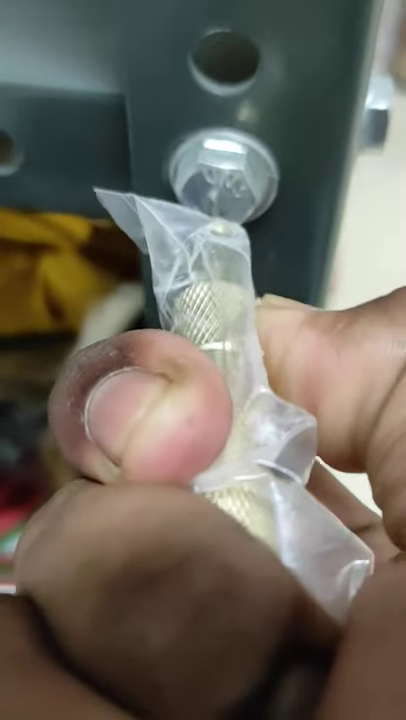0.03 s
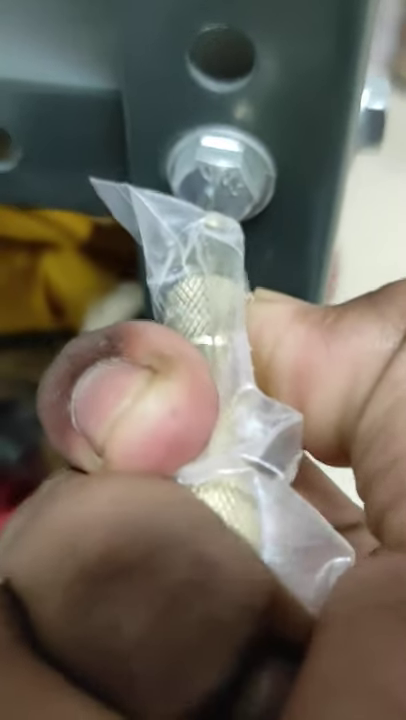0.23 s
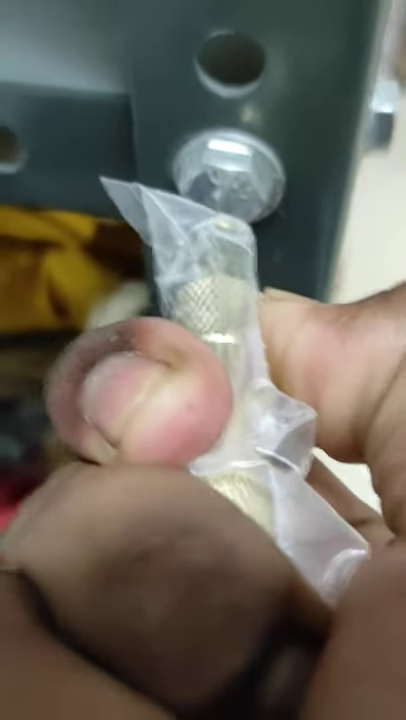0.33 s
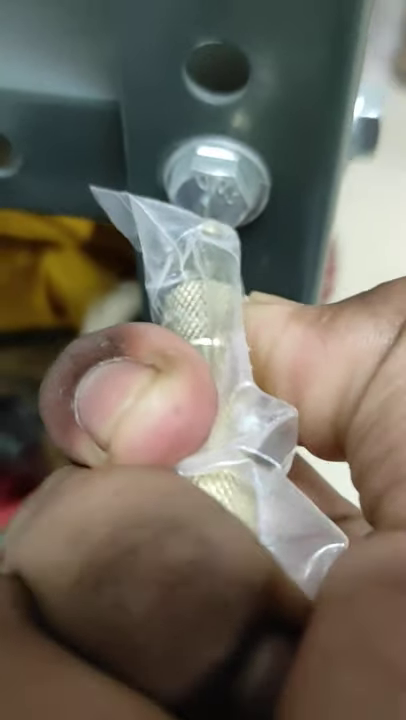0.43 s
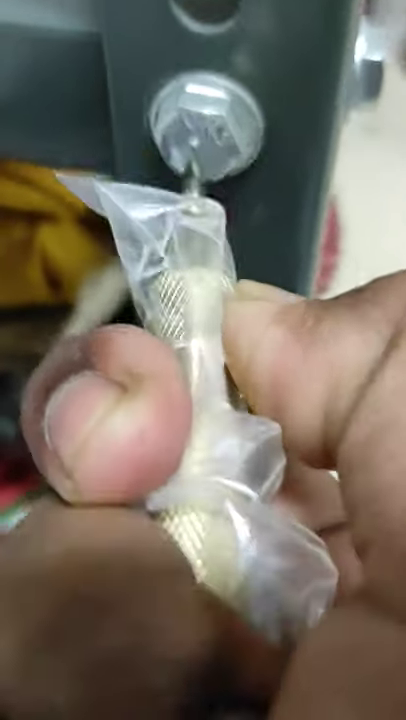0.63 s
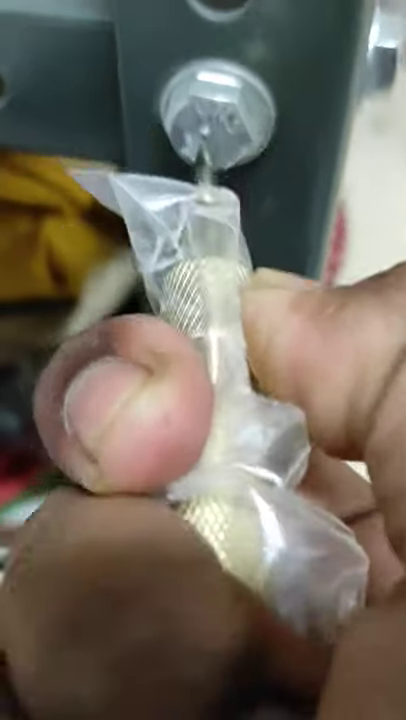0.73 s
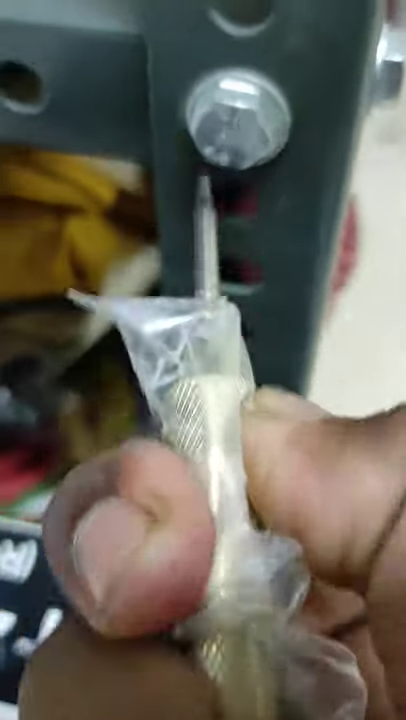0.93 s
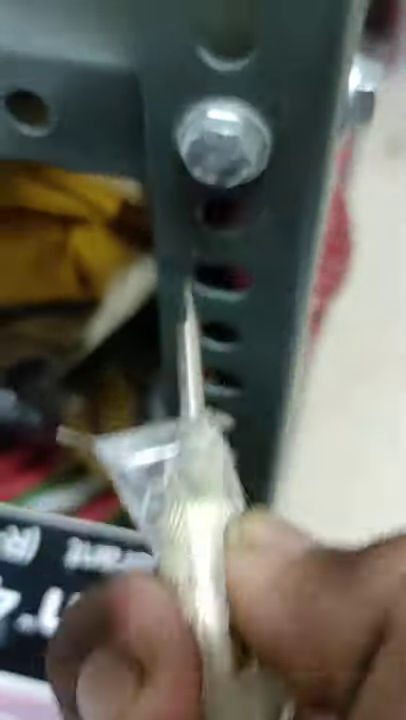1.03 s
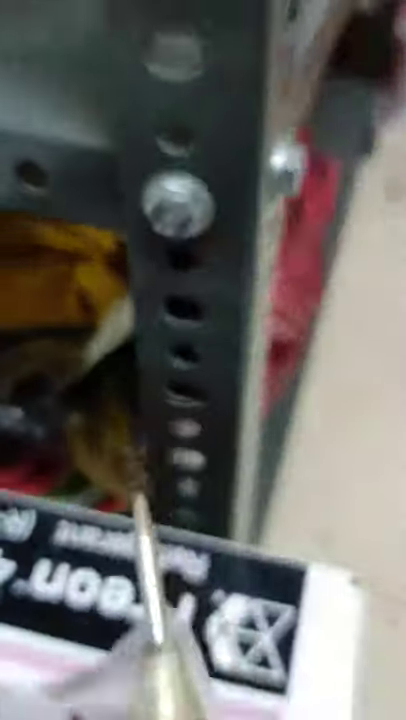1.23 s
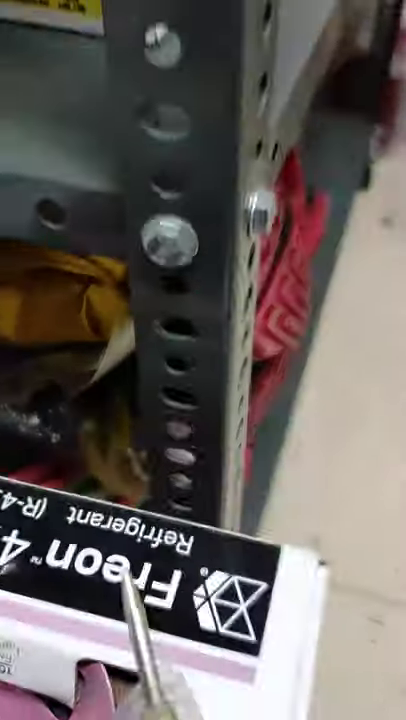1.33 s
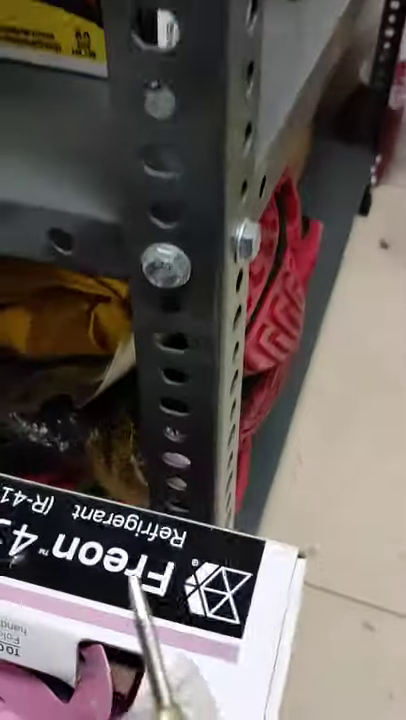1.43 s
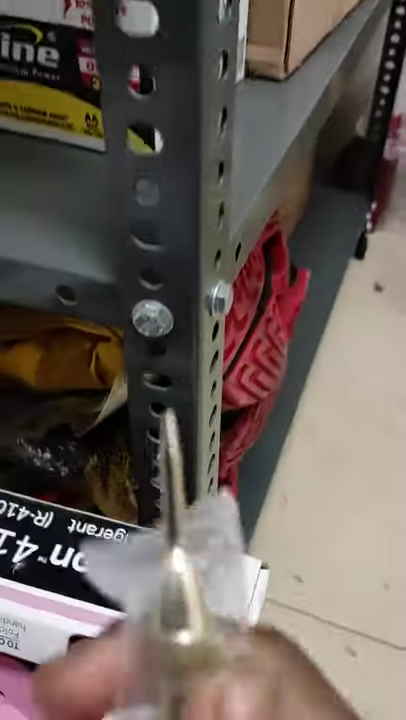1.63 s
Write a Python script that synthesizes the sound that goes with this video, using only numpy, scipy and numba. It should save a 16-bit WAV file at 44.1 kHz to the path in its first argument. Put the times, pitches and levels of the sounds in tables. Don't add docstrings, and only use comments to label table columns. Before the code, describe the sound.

A spring-loaded punch cracks sharply against a bolt on a metal shelf rack, ringing brightly for half a second; the tip clicks loose, plastic bag rustles, and small ticks follow in a quiet humming room, close phone microphone.

```python
import sys
import numpy as np
from scipy import signal
from scipy.fft import rfft, irfft
from scipy.io import wavfile
from scipy.ndimage import uniform_filter1d
from numba import njit

SR = 44100
rng = np.random.default_rng(int(sys.argv[2]) if len(sys.argv) > 2 else 0)


def put_to_file(sound):
    columns = np.atleast_2d(sound).T
    safe = np.clip(columns, -1, 1)
    whole_steps = np.round(safe * 32767)
    wavfile.write(sys.argv[1], SR, whole_steps.astype(np.int16))


def volts(x):
    e = np.asarray(x, float) / 20
    return 10 ** e


N = 74970
t = np.arange(N) / SR
BURST_SIZE = 8192
burst_hz = np.fft.rfftfreq(BURST_SIZE, 1 / SR) + 1


def read(table, hz, col=1):
    a = np.array(table, float)
    return np.interp(np.log(np.maximum(hz, 1)), np.log(a[:, 0]), a[:, col])


def unit(x):
    return x / np.sqrt(np.mean(x ** 2))


def colour(x, table):
    size = x.shape[-1]
    hz = np.fft.rfftfreq(size, 1 / SR)
    return irfft(rfft(x) * volts(read(table, hz)), size)


def pan(x, db):
    return x * volts(np.array([db / 2, -db / 2])).reshape(2, -1)


def add(out, x, s, lag_s=0.):
    for c, at in enumerate((s + lag_s, s)):
        i = int(at * SR)
        out[c, i:i + x.shape[1]] += x[c, :N - i]


@njit
def ring(hz, gain, t60, phase, size):
    y = np.zeros(size)
    for k in range(len(hz)):
        turn = np.exp(2j * np.pi * hz[k] / SR - np.log(1000) / (t60[k] * SR))
        z = gain[k] * np.exp(1j * phase[k])
        for i in range(min(size, int(1.3 * t60[k] * SR))):
            y[i] += z.imag
            z *= turn
    return y


def build_up(build_s):
    return 1 - np.exp(-t[:SR] / build_s)


def modes(spectrum, decay, build_s, count):
    u = rng.random((count, 6)).T
    hz = 60 + 16500 * u[0] ** 1.5
    t60 = read(decay, hz) * (0.77 + .5 * u[1])
    gain = volts(read(spectrum, hz)) * (hz - 40) ** (1 / 6)
    y = np.array([ring(hz, gain * (0.73 + u[2 + c]), t60, 2 * np.pi * u[4 + c], SR) for c in range(2)])
    return y / np.sqrt(np.mean(y[:, :900] ** 2)) * build_up(build_s)


def tone(rows):
    hz, db, t60 = np.repeat(np.array(rows, float), repeats=7, axis=0).T
    u = rng.random((len(hz), 3)).T
    hz = hz * (1 + .02 * (2 * u[0] - 1))
    t60 = np.clip(t60, .005, 2)
    return np.array([ring(hz, volts(db) / 3, t60, 2 * np.pi * p, SR) for p in u[1:]])


def noise_burst(t60, shape):
    x = rng.standard_normal((2, BURST_SIZE))
    x = x * np.exp(-np.log(1000) * t[:BURST_SIZE] / max(t60, .002))
    x[:, 0] = 3
    x = irfft(rfft(np.roll(x, shift=64, axis=1)) * shape, BURST_SIZE)
    x = np.roll(x, shift=-40, axis=1)
    return x / np.abs(x).max(axis=1, keepdims=True)


def rack_ring():
    # pitch_hz, level_db (per Hz)
    ring_spectrum = [(150, -30), (709, -16), (1000, -4.5), (2300, -7.5), (3500, -12), (7370, 3.5),
                     (12300, -25), (15300, -37), (16500, -93)]
    # pitch_hz, t60_s
    ring_decay = [(200, 0.46), (1000, 0.59), (3000, 0.61), (7000, 0.63), (11000, 0.42), (16000, 0.31)]
    return modes(ring_spectrum, ring_decay, build_s=.004, count=4200)


def snap(rack):
    # pitch_hz, level_db (per Hz)
    crack_spectrum = [(35, -33), (60, -7.5), (200, -11), (600, -6.5), (1990, -10), (4120, -16.5),
                      (6760, -4.5), (11000, -20), (15400, -44), (16500, -51)]
    # pitch_hz, t60_s
    crack_decay = [(60, 0.076), (300, 0.11), (900, 0.16), (2000, 0.2), (7000, 0.061), (16000, 0.04)]
    # pitch_hz, level_db, t60_s
    bolt_partials = [(5070, 0, 1), (10100, -18, 0.24), (10620, 4, 0.5), (10940, -4, 0.32),
                     (11900, -2, 0.48), (12730, 1, 0.51), (12600, 1, 0.46), (13300, -5, 0.48),
                     (14110, -4, 0.43), (14980, -3, 0.38)]
    # pitch_hz, level_db, t60_s
    post_partials = [(159, -17, 0.09), (200, -11, 0.52), (274, 3, 0.1), (422, -3, 0.29), (510, -2, .1),
                     (610, 5, 0.12), (845, 1, 0.16), (1016, -3, 0.22), (1052, -1, 0.5), (1400, -14, 0.23),
                     (1635, 8, .25), (1976, 2, 0.18), (2130, 4, 0.17), (2480, 1, 0.18)]
    out = np.zeros((2, N))
    crack = modes(crack_spectrum, crack_decay, build_s=.0012, count=2500)
    post = tone(post_partials) * build_up(.0088)
    bolt = tone(bolt_partials)
    blow = volts(-8) * rack + volts(-5.5) * crack + volts(-27) * bolt + volts(-19.5) * post
    add(out, blow, s=.2048, lag_s=.0009)
    return out


def tool_release():
    # pitch_hz, level_db, t60_s
    tool_partials = [(560, -9, .25), (710, -1, .22), (950, -2, .2), (1104, -4, .2), (1700, -7, .2),
                     (2213, -4, .2), (2600, -5, .15), (3100, -9, .12), (3470, -9, .1), (4705, -11, .15),
                     (5020, -14, .6)]
    out = np.zeros((2, N))
    add(out, volts(-32) * tone(tool_partials) * build_up(.004), s=.6915)
    return out


def ticks(rack):
    # start_s, peak_db, t60_s, left_minus_right_db, rack_send_db
    clicks = [(0.6542, -26.5, 0.059, -6, -35), (0.659, -25.5, 0.029, -6, -34),
              (0.6883, -12, 0.0066, -6, -24), (0.692, -1.5, 0.0073, 1, -33), (0.6942, -12, 0.037, 0, -32),
              (0.9158, -33, .008, -22, -22), (0.9178, -22.5, 0.0033, 0, -25.5),
              (0.9246, -27.5, 0.004, -9, -39), (1.44, -42, 0.023, 8, -18), (1.4565, -39, 0.0089, 13, -18),
              (1.483, -42, 0.032, 11, -30), (1.486, -32, 0.0075, 10, -32), (1.499, -36, 0.028, 7, -40),
              (1.5004, -38, 0.0088, 15, -36), (1.503, -33, 0.0086, 16, -22),
              (1.5282, -15, 0.018, 4.5, -32.5), (1.576, -25.5, 0.0086, 10, -39),
              (1.577, -38, 0.015, 12, -32), (1.605, -39, 0.013, 10, -18), (1.682, -29.5, 0.0096, 7.5, -34)]
    # pitch_hz, level_db (per Hz)
    click_spectrum = [(500, -29), (2500, -5), (4000, -5), (5500, 2.5), (7500, 11), (9200, 0.5),
                      (11000, -16), (16000, -31)]
    out = np.zeros((2, N))
    shape = volts(read(click_spectrum, burst_hz))
    for s, db, t60, lr_db, send_db in clicks:
        add(out, pan(noise_burst(t60, shape), lr_db) * volts(db), s)
        add(out, rack * volts(db + send_db), s)
    return out


def knocks():
    # start_s, peak_db, centre_hz, t60_s
    blows = [(.691, -26, 950, .05), (.691, -20, 2600, .02), (.7, -32, 2300, .2), (.653, -45, 11000, .03),
             (1.457, -44, 1200, .012), (1.5005, -40, 14000, .012), (1.484, -46, 13000, .012),
             (1.485, -31, 8500, .012), (1.5285, -24, 4000, .006), (1.529, -30, 2800, .006),
             (1.528, -36, 14500, .008), (1.398, -48, 12000, .012), (1.576, -26, 5000, .012),
             (1.606, -43, 2500, .02), (1.6815, -29, 1350, .012), (1.6812, -28, 3200, .006),
             (.232, -27, 150, .05), (.27, -40, 200, .3), (.9172, -30, 5800, .008), (.9231, -30, 5200, .006),
             (1.442, -46, 13000, .01), (1.639, -50, 14000, .006), (1.204, -46, 6500, .006)]
    width = 0.36
    out = np.zeros((2, N))
    for s, db, hz, t60 in blows:
        detuning = burst_hz / hz - hz / burst_hz
        add(out, volts(db) * noise_burst(t60, (1 + 1j * detuning / width) ** -2), s)
    return out


def squeak():
    start_s, length_s, pitch_hz, level_db = .677, 0.039, 7050, -34
    progress = np.clip((t - start_s) / length_s, 0, 1)
    swell = np.sqrt(np.sin(np.pi * progress).clip(0))
    wobble = np.cumsum(uniform_filter1d(rng.standard_normal(N), 40)) * 0.076
    return pan(swell * np.sin(2 * np.pi * pitch_hz * t + wobble), -23) * volts(level_db)


def rustle():
    # start_s, level_db, left_minus_right_db
    handling = [(0, -80, 9), (.63, -48, 2), (.655, -39, -3), (0.694, -33.5, -11.5), (.78, -50.5, -1),
                (.83, -49.5, -4), (.87, -47.5, 1), (.92, -40.5, -9), (0.969, -43.5, 1.5), (1.009, -80, 1),
                (1.37, -68, 15), (1.44, -59, 10), (1.52, -64, 0.5), (1.62, -47.5, 6), (1.7, -61, 10)]
    # pitch_hz, level_db (per Hz)
    bag_spectrum = [(700, -7.5), (1500, -7.5), (3000, -7.5), (4200, -8), (7000, -0.5), (9200, -13),
                    (10500, -35), (15500, -29.5)]
    grains_per_s, scatter_db, grain_s = 2300, 4, 0.0017
    s, db, lr_db = np.array(handling, float).T
    struck = rng.random(N) < grains_per_s / SR
    hits = struck * volts(scatter_db * rng.exponential(size=N).clip(max=4))
    grain = np.sqrt(signal.lfilter([1], [1, -np.exp(-1 / (grain_s * SR))], hits ** 2))
    x = unit(colour(grain * rng.standard_normal((2, N)), bag_spectrum))
    return pan(x, np.interp(t, s, lr_db)) * volts(np.interp(t, s, db))


def room_air():
    # pitch_hz, level_db (per Hz)
    air_spectrum = [(12, -75), (20, 3.5), (65, -14), (265, -14.5), (1280, -15), (3620, -38), (8410, -32),
                    (10500, -60.5), (15500, -54.5), (16500, -95)]
    alike_hz, bass_pan_db, flicker_db = 790, 12, 0.3
    f = np.fft.rfftfreq(N, 1 / SR)
    alike = 1 / (1 + (f / alike_hz) ** 2)
    mid, side = rfft(rng.standard_normal((2, N)))
    common, apart = mid * np.sqrt(1 + alike), side * np.sqrt(1 - alike)
    pair = np.array([common + apart, common - apart])
    air = unit(colour(irfft(pan(pair, bass_pan_db / 2 * alike ** 8), N), air_spectrum))
    flicker = volts(flicker_db * unit(uniform_filter1d(rng.standard_normal(N), 2500)))
    return air * flicker * volts(-45.5)


def hum():
    # pitch_hz, level_db (rms), left_lead_rad
    lines = [(64.2, -55, 0.47), (303.9, -57.5, 0.92)]
    drift = np.cumsum(uniform_filter1d(rng.standard_normal(N), 400)) * 0.011
    out = np.zeros((2, N))
    for hz, db, lead in lines:
        phase = 2 * np.pi * hz * t + drift + np.array([[lead], [0]])
        out += np.sqrt(2) * volts(db) * np.sin(phase)
    return out


def scene():
    rack = rack_ring()
    action = snap(rack) + tool_release() + ticks(rack) + knocks() + squeak()
    return action + rustle() + room_air() + hum()


def low_pass(x):
    return signal.sosfilt(signal.butter(12, 16620, fs=SR, output="sos"), x)


def record(dry):
    # pitch_hz, level_db
    mic_response = [(3000, 0.5), (4000, -2.5), (5200, -5.5), (9300, 0.5), (10300, -1.5), (11300, 1.5),
                    (12500, 0), (15300, 1), (16300, -12), (16800, -67)]
    # pitch_hz, left_minus_right_db
    port_difference = [(100, 0.5), (300, 4.5), (3000, 0.5), (5000, -5.5), (6600, -5.5), (7500, -1),
                       (8500, 10), (10500, 2.5), (16000, 3.5)]
    # start_s, gain_db
    duck = [
        (.205, 0.5),
        (.21, -7),
        (.26, -5.5),
        (.33, -3),
        (.44, 3),
        (.52, 1.5),
    ]
    # start_s, left_bias (full scale 1)
    bias_swing = [
        (.205, 0),
        (.226, -.095),
        (.262, 0),
        (.31, .045),
        (.39, .068),
        (.47, .033),
        (.59, 0),
        (.75, -.008),
        (1.05, 0),
    ]
    ceiling = .85
    port_db = read(port_difference, np.fft.rfftfreq(N, 1 / SR))
    heard = irfft(pan(rfft(colour(dry, mic_response)), port_db), N)
    gain = volts(np.interp(t, *np.array(duck).T))
    left_bias = uniform_filter1d(np.interp(t, *np.array(bias_swing).T), size=500)
    bias = left_bias * np.array([[1], [.43]])
    return low_pass(ceiling * np.tanh((heard * gain + bias) / ceiling))


dry = scene()
out = record(dry)
put_to_file(out)
```